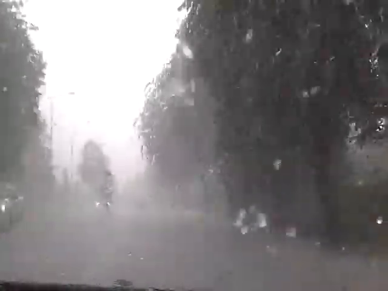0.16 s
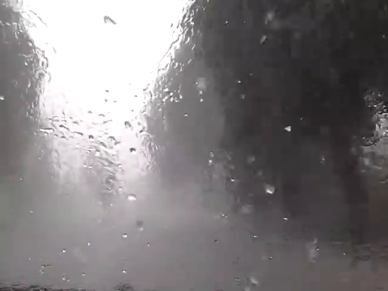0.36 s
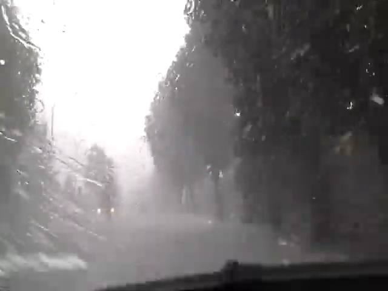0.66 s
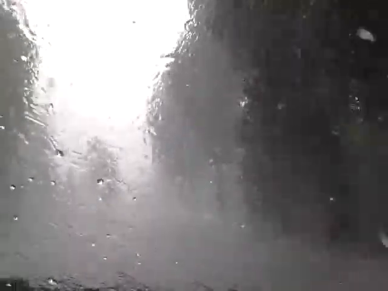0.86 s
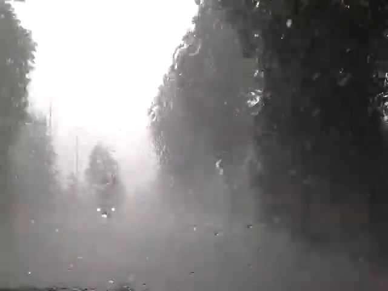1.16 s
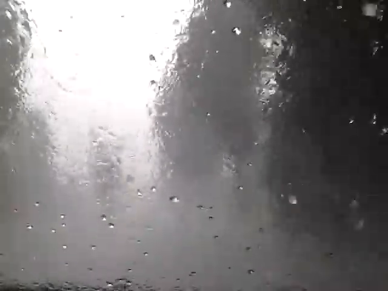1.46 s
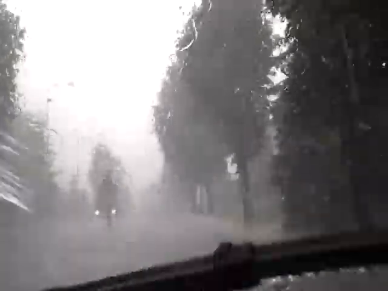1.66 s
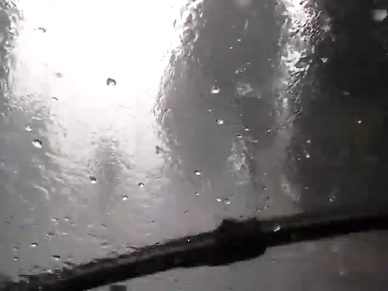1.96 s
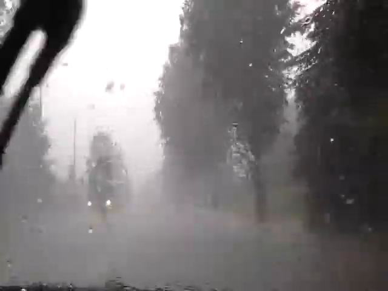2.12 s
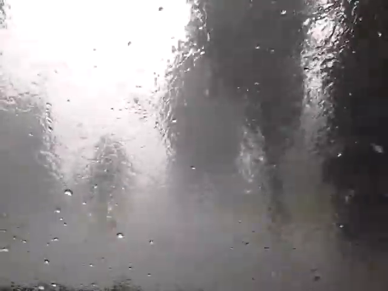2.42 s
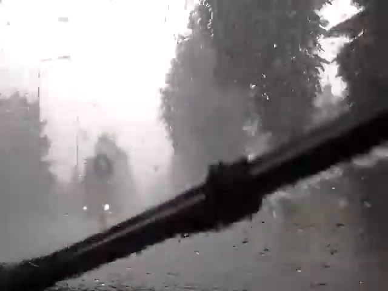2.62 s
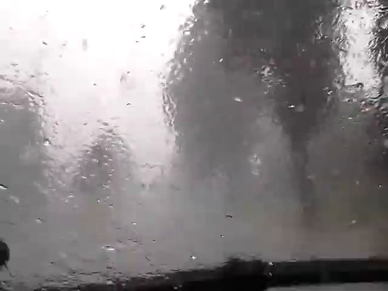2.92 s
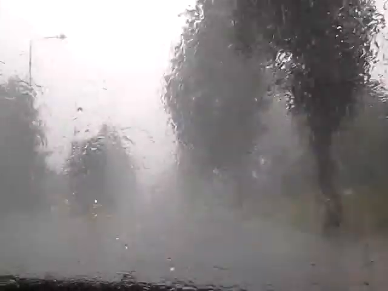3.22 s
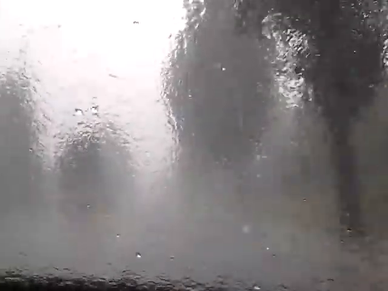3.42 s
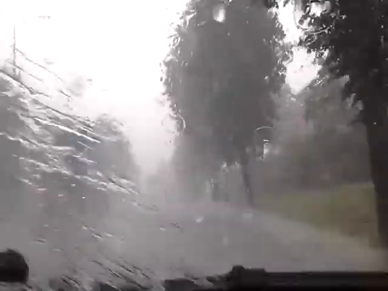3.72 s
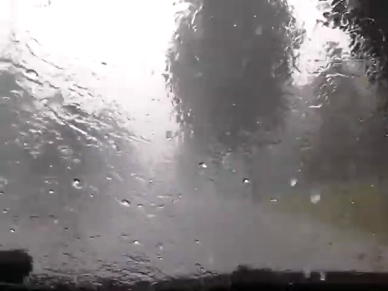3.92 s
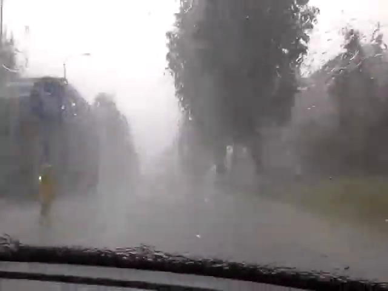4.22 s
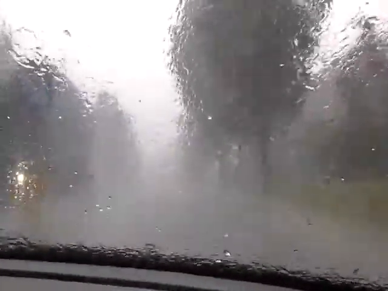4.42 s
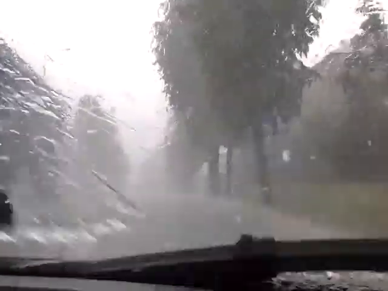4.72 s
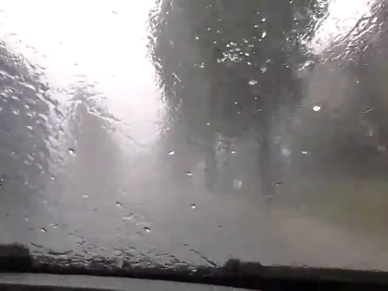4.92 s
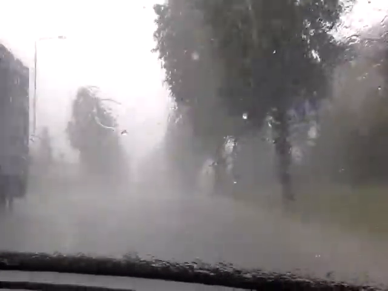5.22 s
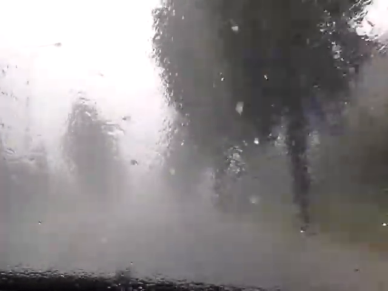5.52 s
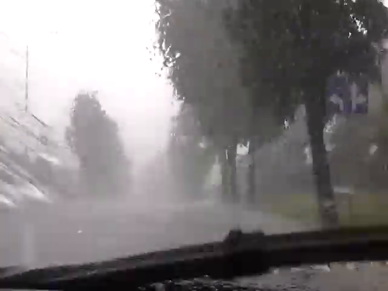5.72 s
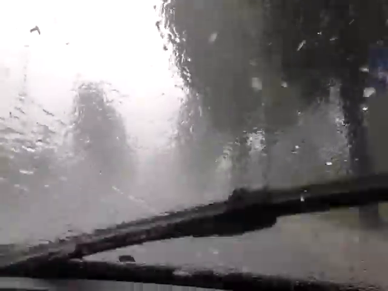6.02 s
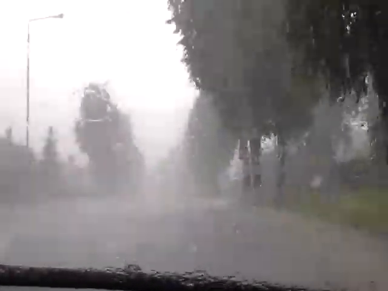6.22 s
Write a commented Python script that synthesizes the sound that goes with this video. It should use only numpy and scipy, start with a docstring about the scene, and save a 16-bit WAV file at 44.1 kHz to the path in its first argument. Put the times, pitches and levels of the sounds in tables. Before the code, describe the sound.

Heard from inside a car, hail and heavy rain beat on the metal and glass from 0 to about 6.4 seconds, already at full force at the start and never stopping. Around fifty irregular hailstone blows a second land, each a bright hard crack with a knock and thud, followed by a short dense noisy ring of panel and cabin lasting about a tenth of a second. Rain and small hail patter between them in brief flurries and lulls; dry pellets tick on glass. Soft low bumps come and go underneath, but bass is thin. Especially hard hits stand out near 2.6, 3.0, 3.2, 4.6 and 5.8 seconds. From about 2.4 the bright edge slowly dulls, is darkest near 5.2, then opens again to the end. The sound is close, wide and harsh, with the loudest cracks clipping the stereo microphone.

```python
"""Hail and heavy rain beat on a car, heard from inside, from the first moment to the last.
A blow starts with a crack on the panel, then leaves a short dense ring of filtered noise in metal and cabin.
Drops fill the gaps in flurries and lulls, pellets tick dryly, and soft low bumps swell and fade underneath.
From about 2.4 s the bright edge slowly dulls, is darkest at 5.2 s, then opens up again.
A two-port microphone with a thin bass overloads on the hardest blows throughout."""
import sys
import numpy as np
from scipy import signal
from scipy.fft import rfft, irfft, next_fast_len
from scipy.io import wavfile

SR = 44100
rng = np.random.default_rng(int(sys.argv[2]) if len(sys.argv) > 2 else 0)


def unload_wav(signal):
    """Save mono or channel-first audio to the path in sys.argv[1] as 16-bit WAV at rate SR, clipped to [-1, 1]."""
    wavfile.write(
        sys.argv[1],
        SR,
        np.round(np.clip(np.atleast_2d(signal).T, -1, 1) * 32767).astype(np.int16),
    )


N = 280917
LEFT_RIGHT = np.array([[1], [-1]])   # sign of half a left-right difference


def from_db(db):
    """Decibels become an amplitude factor."""
    return 10 ** (np.asarray(db) / 20)


def rms_one(x):
    """Scale a sound to an rms of 1."""
    return x / np.sqrt(np.mean(x ** 2) + 1e-20)


def at_hz(curve, hz):
    """Read a curve at a pitch, with straight lines over log frequency."""
    curve_hz, values = np.transpose(curve)
    return np.interp(np.log(hz), np.log(curve_hz), values)


def filtered(x, order, hz, kind):
    """Butterworth filter along time."""
    return signal.sosfilt(signal.butter(order, hz, kind, fs=SR, output="sos"), x)


# Decay of panel and cabin. Each row: frequency in Hz, time to fall by 60 dB in seconds.
PANEL_DECAY = [(250, 0.17), (700, 0.083), (1500, 0.11), (4000, 0.054), (8000, 0.12)]
# How much the ports share. Each row: frequency in Hz, left-right likeness from 0 to 1.
PORT_LIKENESS = [(150, 1), (330, 0.73), (700, 0.4), (1400, 0.26), (4000, 0.34), (8000, 0.069)]
# The ports differ in colour. Each row: frequency in Hz, left minus right in dB.
PORT_COLOUR = [(60, -1), (140, 8), (310, 0), (720, 1), (1100, 0), (1640, 2), (2100, 2), (2500, 4.5),
               (3300, 5), (4200, 7.5), (4800, 1), (5400, -2), (6800, -3), (8570, 0)]
LEFT_LAG_S = 0.00045   # the shared sound reaches the left port later; full lag from 1 kHz up
PART_HZ = [1200, 2400]   # thud below, knock between, crack above
TICK_T60_S = 0.023   # the direct tick over the ring
SPOT_SPREAD_DB, SPOT_TILT_DB = 3.0, 1.5   # spread per band; spread of brightness per octave
CONTACT_CYCLES = 2.0   # a blow builds up over about two cycles of each band


def panel_rings(colour, tick_db, count):
    """What a blow on each of several spots sends to the ports: (thud, knock, crack) x spot x side x time.
    The modes lie too close to tell apart: noise in fifths of an octave, each dying at its own rate."""
    t = np.arange(6144) / SR
    run_in = 1024   # samples for the filters to settle
    edges = 140 * 2 ** (np.arange(31) / 5)
    rings = np.zeros((3, count, 2, len(t)))
    tick = from_db(tick_db - 60 * t / TICK_T60_S)
    tilt_db = SPOT_TILT_DB * rng.standard_normal((count, 1, 1))
    for low, high in zip(edges, edges[1:]):
        hz = np.sqrt(low * high)
        alike, t60 = at_hz(PORT_LIKENESS, hz), at_hz(PANEL_DECAY, hz)
        shared, left, right = rng.standard_normal((3, count, len(t) + run_in))
        lag = round(LEFT_LAG_S * SR * min(1, hz / 1000))   # the bass arrives closer together
        common = np.stack([np.roll(shared, lag, axis=1), shared], axis=1)
        separate = np.stack([left, right], axis=1)
        noise = np.sqrt(alike) * common + np.sqrt(1 - alike) * separate
        steady = filtered(noise, 2, [low, high], "band")[..., run_in:]

        decay = tick + from_db(-60 * t / t60)
        build_up = 1 - np.exp(-t * hz / CONTACT_CYCLES)
        band = steady * decay * build_up / np.sqrt(t60)   # long rings start softer
        side_db = at_hz(PORT_COLOUR, hz) / 2 * LEFT_RIGHT
        # every spot favours other modes, and some spots are brighter
        spot_db = SPOT_SPREAD_DB * rng.standard_normal((count, 1, 1)) + tilt_db * np.log2(hz / PART_HZ[1])
        part = np.searchsorted(PART_HZ, hz)
        rings[part] += from_db(at_hz(colour, hz) + side_db + spot_db) * band
    return rings


def strike(at, sizes, pan_db, rings):
    """Blows are dealt to the spots in turn; each sets off the ring of its spot by convolution."""
    size = next_fast_len(N + rings.shape[-1])
    out = np.zeros((2, N))
    for side, sign in enumerate((1, -1)):
        side_sizes = sizes * from_db(sign * pan_db / 2)
        spectrum = 0
        for spot, ring in enumerate(rings):
            mine = slice(spot, None, len(rings))
            clicks = np.zeros(N)
            np.add.at(clicks, at[mine], side_sizes[mine])
            spectrum = spectrum + rfft(clicks, size) * rfft(ring[side], size)
        out[side] = irfft(spectrum, size)[:N]
    return out


# Flurries and lulls of the shower. Each row: middle in seconds, change in dB, whole length in seconds.
FLURRIES = [(0.472, -6, 0.043), (0.514, 8, 0.04), (0.939, -6, 0.11), (1.302, -3, 0.037),
            (1.525, -6.5, 0.062), (2.694, 2.5, 0.12), (2.904, 2, 0.058), (2.986, 5, 0.089),
            (3.129, 5.5, 0.11), (3.278, -9.5, 0.083), (3.308, 6, 0.035), (3.355, -7, 0.078),
            (3.506, 7, 0.063), (3.792, -10.5, 0.057), (3.893, 5.5, 0.055), (4.019, -10, 0.053),
            (4.442, -6, 0.085), (4.583, 2.5, 0.64), (4.778, -17, 0.043), (4.992, -6, 0.038),
            (5.028, 5.5, 0.033), (5.05, -4.5, 0.027), (5.09, 9, 0.064), (5.151, -7, 0.099),
            (5.253, -3, 0.047), (5.308, 9, 0.12), (5.916, -4.5, 0.069), (5.98, -5.5, 0.11),
            (6.052, 4.5, 0.26)]


def flurries_db():
    """Each flurry or lull swells and fades as a smooth raised cosine in dB."""
    t = np.arange(N) / SR
    out = np.zeros(N)
    for middle_s, change_db, length_s in FLURRIES:
        out += change_db * np.cos(np.pi * np.clip((t - middle_s) / length_s, -.5, .5)) ** 2
    return out


# Slow course of the shower. Each row: time in seconds, level in dB before the flurries.
SHOWER_LEVEL = [(0.0, -15), (0.19, -16), (3.48, -16.5), (4.33, -17.5), (4.75, -16.5), (5.2, -19),
                (5.62, -15.5), (6.37, -19.5)]
# Colour of a drop on a panel. Each row: frequency in Hz, relative level in dB per Hz.
DROP_TONE = [(71, -69), (120, -18), (199, -15.5), (361, -4.5), (519, -4.5), (731, -3), (1330, -5.5),
             (1560, -2), (1910, -9.5), (3000, 1), (3930, -2.5), (4600, -2), (5300, -7), (5850, -9.5),
             (7390, -12.5), (8090, -17.5), (9020, -56), (11700, -76), (19800, -120)]
DROPS_PER_S, DROP_TICK_DB = 1000, -4.5   # tick level is over the ring
DROP_SPREAD_DB, DROP_PAN_DB = 3.5, 3.0   # scale of the exponential spread; left-right spread


def shower():
    """Drops and small hail hit the panels at random moments, many weak and a few strong."""
    at = np.flatnonzero(rng.random(N) < DROPS_PER_S / SR)
    count = len(at)
    size_db = DROP_SPREAD_DB * np.minimum(rng.exponential(1, count), 2.8)   # capped
    sizes = from_db(size_db) * rng.choice([-1, 1], count)
    pan_db = DROP_PAN_DB * rng.standard_normal(count)
    rings = panel_rings(DROP_TONE, DROP_TICK_DB, count=12).sum(axis=0)
    patter = strike(at, sizes, pan_db, rings)
    s, level_db = np.transpose(SHOWER_LEVEL)
    return rms_one(patter) * from_db(flurries_db() + np.interp(np.arange(N) / SR, s, level_db))


# Soft low bumps under the hail.
# Each row: middle in seconds, peak in dB midway between the sides, pitch in Hz.
LOW_BUMPS = [(0.339, -39.5, 170), (0.408, -42.0, 117.0), (0.51, -40, 115.0), (0.51, -38, 60),
             (0.639, -31, 176), (0.789, -35, 181.0), (0.895, -43, 179), (1.027, -39, 134.0),
             (1.258, -39, 181.0), (1.32, -41, 45), (1.39, -41, 112.0), (1.416, -39.5, 163.0),
             (1.704, -41, 181.0), (1.774, -44, 119.0), (2.07, -50, 50), (2.078, -42, 127),
             (2.174, -49, 129.0), (2.2, -39, 60.0), (2.212, -37, 177.0), (2.371, -39, 169),
             (2.451, -43, 118.0), (2.493, -37, 174), (2.67, -40.0, 65.0), (2.746, -41.5, 195),
             (2.796, -45.5, 111.0), (2.854, -40.0, 162.0), (2.905, -40, 123.0), (3.059, -38, 161),
             (3.14, -31, 125), (3.22, -40, 55), (3.431, -38, 96.0), (3.51, -31, 166), (3.53, -38, 65.0),
             (3.878, -48.0, 101.0), (3.89, -38, 55), (4.079, -41, 117.0), (4.217, -34.5, 179),
             (4.395, -38, 174), (4.503, -38.5, 178.0), (4.56, -29, 60.0), (4.57, -38, 110.0),
             (4.66, -38, 45.0), (4.668, -32, 195), (4.855, -37, 124), (4.966, -39, 178.0),
             (5.101, -39, 194.0), (5.14, -43, 119), (5.193, -45, 113.0), (5.361, -44, 117),
             (5.469, -43, 175), (5.598, -33, 169), (5.676, -41, 123.0), (5.781, -44, 59.6),
             (5.782, -46, 113.0), (6.02, -36, 60), (6.025, -48, 115.0)]
BUMP_S, BUMP_LEFT_DB = 0.045, 3.0   # whole length; left minus right
BUMP_SKEW_RAD = 1.2   # random spread of the phase on each side


def low_bumps():
    """A low tone swells and fades softly within a moment; the two sides are out of step."""
    out = np.zeros((2, N))
    reach = SR // 10   # samples on either side of the middle
    t = np.arange(-reach, reach) / SR
    swell = np.cos(np.pi * np.clip(t / BUMP_S, -.5, .5)) ** 2
    phases = rng.normal(0, BUMP_SKEW_RAD, (len(LOW_BUMPS), 2, 1))
    for (middle_s, peak_db, hz), phase in zip(LOW_BUMPS, phases):
        sides = from_db(peak_db + BUMP_LEFT_DB / 2 * LEFT_RIGHT)
        first = int(middle_s * SR) - reach
        out[:, first:first + len(t)] += sides * swell * np.sin(2 * np.pi * hz * t + phase)
    return out


# Small hard pellets on the glass.
# Each row: start in seconds, peak of the treble in dB, the band below in dB relative to that peak.
GLASS_PELLETS = [(0.061, -11, -1), (0.1246, -21, 10), (0.1866, -23, 11), (0.2545, -23, 6), (0.3058, -16, 7),
                 (0.349, -25, 13), (0.4033, -18, 15), (0.4543, -19, 8), (0.5514, -23, 12), (0.66, -13, -5),
                 (0.67, -17, 8), (0.6801, -11, 4), (0.6934, -19, 5), (0.714, -26, 14), (0.7339, -21, -1),
                 (0.7812, -22, 8), (0.8707, -19, 9), (0.8874, -26, 13), (0.9168, -25, 14), (0.9377, -20, 6),
                 (0.9667, -30, 9), (1.0503, -23, 12), (1.1536, -17, 9), (1.1965, -18, 11), (1.2114, -15, 3),
                 (1.2865, -27, 14), (1.3468, -14, 8), (1.3859, -14, 4), (1.4461, -24, 13), (1.4588, -23, 9),
                 (1.4965, -29, 16), (1.7516, -23, 9), (1.7727, -15, 2), (1.8569, -16, 11), (1.8883, -25, 9),
                 (1.9486, -26, 9), (2.1124, -16, 2), (2.142, -15, 0), (2.2319, -25, 8), (2.2911, -20, 9),
                 (2.4213, -24, 7), (2.5137, -18, 9), (2.7346, -22, 9), (3.0379, -19, 9), (3.1721, -24, 8),
                 (3.249, -22, 8), (3.3034, -13, 5), (3.3328, -19, 8), (3.3673, -24, 12), (3.3881, -23, 10),
                 (3.4022, -24, 14), (3.5351, -23, 8), (3.5771, -25, 6), (3.7415, -28, 10), (3.9204, -14, 1),
                 (3.9417, -15, 5), (3.984, -17, 2), (4.0825, -13, 9), (4.1418, -9, -2), (4.1588, -21, 3),
                 (4.2541, -28, 9), (4.2782, -24, 13), (4.4097, -27, 4), (4.4198, -33, 10), (4.489, -19, 9),
                 (4.5133, -14, 3), (4.5467, -20, 9), (4.5631, -22, 12), (4.762, -15, -7), (4.7704, -22, 12),
                 (4.839, -21, 7), (4.9382, -28, 9), (4.9682, -15, 8), (5.0624, -28, 7), (5.1045, -9, 0),
                 (5.137, -18, 3), (5.1924, -15, 3), (5.3109, -16, 6), (5.3609, -20, 4), (5.6022, -13, -2),
                 (5.6406, -20, 10), (5.6667, -19, -2), (5.7955, -17, 6), (5.9226, -12, -1),
                 (5.9551, -17, -2), (6.0212, -16, 0), (6.0793, -13, 2), (6.2565, -16, 6), (6.3138, -17, 3),
                 (6.3477, -24, 4)]
# The two bands of a pellet, treble first. Each row: lower edge in Hz, upper edge in Hz.
PELLET_BANDS = [(5300, 8000), (3300, 5200)]
PELLET_T60_S = [0.015, 0.014]   # treble, band below
PELLET_RISE_S, PELLET_PAN_DB = 0.0002, 1   # rise time constant; left-right spread


def pellets():
    """Each is a dry tick of a few milliseconds in two noise bands, without the ring of the sheet metal."""
    t = np.arange(1024) / SR
    out = np.zeros((2, N + len(t)))
    s, treble_db, below_db = np.transpose(GLASS_PELLETS)
    starts = (s * SR).astype(int)
    pan_db = PELLET_PAN_DB * rng.standard_normal((len(s), 1, 1)) / 2 * LEFT_RIGHT
    band_levels_db = (treble_db, treble_db + below_db)
    for edges, level_db, t60 in zip(PELLET_BANDS, band_levels_db, PELLET_T60_S):
        noise = filtered(rng.standard_normal((len(s), 2, len(t))), 2, edges, "band")
        ticks = noise * from_db(-60 * t / t60) * (1 - np.exp(-t / PELLET_RISE_S))
        ticks = ticks / np.abs(ticks.mean(axis=1)).max(axis=1)[:, None, None]   # port mean peaks at 1
        side_db = at_hz(PORT_COLOUR, np.sqrt(edges[0] * edges[1])) / 2 * LEFT_RIGHT
        ticks = ticks * from_db(level_db[:, None, None] + pan_db + side_db)
        for start, tick in zip(starts, ticks):
            out[:, start:start + len(t)] += tick
    return out[:, :N]


# The hailstones. Each row: start in seconds, peak of the crack in dB, knock and then thud as
# rms in dB relative to that peak, left minus right in dB.
HAILSTONES = [(0.0055, -13, -17, -13, -1), (0.038, -18, -19, -4.5, 1), (0.061, -8, -12.5, -17, 2),
              (0.0946, -17, -28, -18, 5), (0.111, -16, -15, -22, -4), (0.119, -12, -9, -22, -2),
              (0.1266, -10.5, -18, -15, 2), (0.1384, -4, -21, -20, -2), (0.1444, 0.5, -19, -22, 0),
              (0.1873, -9, -22, -13.5, 0), (0.218, -6, -13, -17, -3), (0.235, -16, -9, -27, -2),
              (0.2545, -4, -21, -23, 5), (0.2667, -8.5, -25, -17.5, 6.5), (0.2907, -12, -22, -33, -2),
              (0.3048, -4, -22, -33, 8), (0.3132, -8, -29, -19, -5), (0.3456, -5, -9, -19, 1.5),
              (0.3792, -12.5, -14, -12, -4), (0.4028, -2.5, -15, -17, 6), (0.427, -4.5, -18, -15, -2),
              (0.454, -7.5, -30, -17, 3), (0.47, -13, -19, -15, 0), (0.4957, -3.5, -11, -22, 1),
              (0.5076, 2, -15, -21.5, 3), (0.5129, -1.5, -14, -23, -11), (0.5193, -10, -17, -16, 6),
              (0.5513, 2.5, -20.5, -18, -0.5), (0.5924, -12, -8, -11.5, 0), (0.604, -6, -21, -19, 6),
              (0.6128, -5, -18, -18, 1.5), (0.6433, -9.5, -16, -10, 1), (0.659, -3.5, -24, -19.5, 1),
              (0.6694, -10, -22, -30, -3), (0.68, -5.5, -22, -24, 3), (0.6937, -14, -23, -26, 1),
              (0.712, -12, -15, -25, 5), (0.733, -13, -28, -28, 8), (0.746, -18, -18, -5, 1),
              (0.757, -16, -8, -13, -1), (0.7801, -4, -19, -21, 2), (0.7942, -7, -19, -26, 0),
              (0.8278, -7, -19, -16, -5), (0.857, -9.5, -10, -11, 0), (0.87, -3, -26, -28, -3),
              (0.8857, -20, -22, -25, -2), (0.8983, -17, -15, -12, -3), (0.9157, -4.5, -25, -21, -2),
              (0.937, -7.5, -18, -22, 5), (0.9659, -6, -22, -22, 0), (0.9984, -10, -22, -24, 5),
              (1.008, -3.5, -19, -16.5, 1), (1.0358, -9, -26, -19, 2), (1.0485, -6, -22, -24, -4),
              (1.0579, -6, -18, -17, -2), (1.08, -1.5, -19.5, -15.5, 0), (1.1117, -15.5, -4.5, -11, 1),
              (1.127, -20, -3, -9, -8), (1.1524, -2, -23, -34, 1), (1.1847, -12, -11, -27, 0),
              (1.1968, -9, -11, -14, -2), (1.211, -10, -12, -18, 0), (1.2345, -1, -24, -18.5, 1.5),
              (1.256, -4.5, -21, -18, 1), (1.267, -13, -13, -26, -3), (1.2871, -13, -15, -16, 4),
              (1.3119, -11, -13, -10.5, -1), (1.3269, -19, -19, -22, -2), (1.3467, -7.5, -32, -38, 8),
              (1.3695, -14, -23, -26, 3), (1.3843, -5, -32, -31, -4), (1.397, -7, -18, -23, 1),
              (1.4152, -4.5, -28, -24, 1), (1.422, -8, -26, -24, 1), (1.4457, -11, -30, -26, 8),
              (1.4942, -8.5, -21, -19.5, 6), (1.504, -12, -19, -28, 8), (1.5217, -12, -31, -29, 0),
              (1.5418, -16, -22, -15, 0), (1.5473, -6, -27, -23, 4), (1.5796, -14, -30, -32, 5),
              (1.5965, -4.5, -28, -33, 2), (1.635, -12, -7.5, -10, 5), (1.665, -15, -27, -15, 0),
              (1.6818, -9, -27, -27, 2), (1.6914, -1, -17.5, -25, -2), (1.7046, -9, -31, -34, -4),
              (1.7165, -9, -20, -25, 1), (1.7247, -3, -24, -31, 0), (1.7701, -2.5, -22, -30, -2),
              (1.791, -7, -26, -32, -2), (1.8046, -8, -18, -20, 7), (1.8148, -14, -21, -34, 4),
              (1.8245, -12.5, -30, -34, 0), (1.8456, -12, -22, -21, -2), (1.8566, 0, -17, -30, 0),
              (1.867, -21, -22, -23, -1), (1.8858, -7.5, -25, -21, 4), (1.9219, -3.5, -18, -15.5, 1),
              (1.9374, -6, -23, -22, 3), (1.9473, -8, -20, -21, 3), (1.9856, -4, -22, -19.5, -4.5),
              (2.0134, -1.5, -22, -22, -1), (2.0461, -4.5, -25, -23, -3), (2.059, 2, -24, -22.5, 4),
              (2.087, -6, -17, -17, -3), (2.1118, -6.5, -21, -29, 4), (2.125, -14, -17, -28, 2),
              (2.139, -13, -20, -20, -2), (2.164, -7, -20, -19, 3), (2.1734, -7.5, -11, -25, 3),
              (2.1847, -4.5, -12.5, -16, 2), (2.2174, 0, -20, -21.5, 4), (2.2297, -5.5, -31, -30, 13),
              (2.243, -9, -29, -22, 3), (2.2514, -6, -31, -21, -3), (2.2891, -7.5, -20, -17.5, -1),
              (2.322, -8, -15, -17, -1), (2.3308, -6.5, -14, -25, 2), (2.352, -14, -10, -9, 0),
              (2.3752, -14.5, -7, 0, -3), (2.3909, -9, -9, -9, 0), (2.4005, -7, -19, -20, 4),
              (2.421, -6.5, -17, -15, -1), (2.4408, -7.5, -7, -10.5, 0), (2.454, -6, -20, -33, 4),
              (2.465, -21, -16, -31, 2), (2.4883, -13, -30, -28, 9), (2.512, -5.5, -31, -31, 6),
              (2.5283, -3.5, -13.5, -27, 0), (2.5495, -16, -14, -20, 0), (2.568, -7.5, -15, -16.5, -1),
              (2.582, -11, -8, -16, 1), (2.6125, -16, -19, -8.5, -2), (2.62, -17, -15, -4.5, -1),
              (2.6455, 4.5, -25, -25, 1.5), (2.656, -7, -12, -8.5, 1), (2.672, -12.5, -10, -3.5, 0),
              (2.698, -13, -11, -10, 3), (2.7172, -14, -15, -18, 2), (2.7326, -7.5, -15, -20, 2),
              (2.7622, -10, -13, -23, 2), (2.7806, -8, -17, -20, 1), (2.7975, -2.5, -31, -28, -2),
              (2.8082, 2.5, -27, -21, 0), (2.8532, -6, -21, -25, -2), (2.863, -8, -22, -25, 3),
              (2.8738, -6.5, -11.5, -18, 1), (2.893, -9, -10, -18, 8), (2.913, 2, -19, -22.5, 1),
              (2.9606, -17, -18, -11, -5), (2.975, 5, -18, -32, 5), (2.9985, -11, -17, -19, 1),
              (3.0196, -7.5, -15, -16, 1), (3.0378, -3.5, -13, -20, 1), (3.0766, -12.5, -12, -11, 2),
              (3.1116, -8, -14, -15, -5), (3.1225, -7.5, -18, -14, 10), (3.1324, -2, -15, -22, 2),
              (3.1389, 0, -15, -24, -3), (3.17, -4, -17, -38, 3), (3.195, -17, -26, -26, 4),
              (3.2122, 6, -19.5, -21, 0.5), (3.2327, -11, -19, -35, 2), (3.248, -7.5, -15, -17.5, 4.5),
              (3.3035, -3, -23, -30, -3), (3.313, -9, -15, -12.5, 4), (3.333, -6.5, -20, -28, 3),
              (3.3663, -7, -22, -32, 2), (3.3877, -2.5, -23, -17, 0), (3.402, -9, -26, -29, 7),
              (3.4281, -20, -18, -18, -1), (3.4348, -16, -15, -12, 0), (3.4498, -5.5, -18, -31, 6),
              (3.4635, -8.5, -15, -16, -2), (3.483, -1, -31, -26, 5), (3.493, -9, -24, -15, 4),
              (3.4975, -8, -15, -27, 9), (3.5064, -9, -20, -4.5, 4), (3.5346, -4, -19, -34, 0),
              (3.553, -2.5, -19, -22, 1), (3.576, -5.5, -29, -29, 11), (3.5854, -9, -27, -26, -8),
              (3.602, -11, -29, -26, 3), (3.6143, -8, -24, -32, 5), (3.6404, -7, -18, -30, 3),
              (3.6703, -3, -23, -21.5, 0), (3.6864, -5, -20, -20, 5), (3.701, -3, -25, -28, -2.5),
              (3.7134, -9, -27, -25, 2), (3.7396, -5, -23, -28, 2), (3.751, -8.5, -28, -23, 11),
              (3.7632, -13, -23, -33, 0), (3.7929, -6.5, -26, -28, 1), (3.8083, -11, -16, -22, 2),
              (3.8127, -2, -23, -24, 0), (3.8412, -13, -19, -33, 1), (3.862, -24, -17, -19, 5),
              (3.8771, -9.5, -4.5, -6.5, 3.5), (3.8971, -4, -16, -26, 4), (3.9187, -3, -19, -28, 4),
              (3.947, -7, -18, -20.5, 7), (3.9847, -4.5, -19, -34, 0), (3.999, -8, -24, -31, -4),
              (4.0114, -8, -17, -25, 4), (4.0448, -13, -11, -9, 2), (4.0535, -4, -15, -10.5, 0),
              (4.0812, -0.5, -22, -21, 4), (4.1085, -21, -12, -6.5, -7), (4.1328, -2.5, -20, -26, 5.5),
              (4.1404, -5, -25, -18, -2), (4.1589, -0.5, -32, -23.5, -1), (4.1992, -5.5, -27, -21, 6),
              (4.216, 2, -20.5, -23, -2), (4.2531, -2.5, -18, -19.5, -2), (4.2776, -8, -16, -20, -2),
              (4.3138, -10, -26, -20, 7), (4.3198, -9.5, -16, -27, 9), (4.343, -19, -24, -28, 7),
              (4.3617, -15, -25, -26, 8), (4.3829, -15.5, -8, -12, 6), (4.4097, -9.5, -18, -21, 6),
              (4.4186, -6, -15, -25, 3), (4.4438, -13, -14, -15, 3), (4.455, -12, -24, -15, 1),
              (4.487, 2, -23, -21, -3), (4.4988, -1.5, -24, -21.5, 1), (4.5126, -3, -24, -17, 0),
              (4.5462, 0, -11.5, -16, 5), (4.5616, 5.5, -16.5, -17, 0), (4.612, 0.5, -14, -20, 0),
              (4.62, 0.5, -20, -18, 1), (4.6374, -7, -21, -24, -2), (4.6467, -6, -19, -22, 2),
              (4.6668, 2, -16, -19, 2), (4.677, 1.5, -21, -23, 0), (4.7042, -18, -7, -12, -4),
              (4.7365, -7.5, -10, -16, -5), (4.7431, -2.5, -10, -23, 5), (4.7607, -8, -20, -17, -9),
              (4.771, -9, -24, -19, 5), (4.796, -1.5, -19.5, -23, 1), (4.816, -9, -19, -14.5, 2),
              (4.824, -16, -20, -15, 5), (4.8355, -2.5, -25, -25, 1), (4.8526, -13, -20, -22, 4),
              (4.8804, -5.5, -10.5, -19.5, 2), (4.9108, -7.5, -12, -14.5, -4), (4.919, -4.5, -12, -18.5, 6),
              (4.9368, -10, -13, -14, 11), (4.9672, 2.5, -25, -22.5, 2), (5.012, -15, -10, -16, -5),
              (5.028, -7.5, -16, -24, 2), (5.035, -12.5, -6.5, -9.5, 0), (5.062, -6, -16, -19, 4),
              (5.079, -7, -7, -19, 7), (5.0892, -14, -7, -6.5, -13), (5.1042, -3.5, -19, -19, 3),
              (5.1187, -14, -25, -31, 9), (5.1365, -1, -22.5, -25, -1), (5.171, -10, -14, -25, 3),
              (5.1907, 1.5, -20, -22, 5), (5.216, -2.5, -17, -22, 2), (5.2371, -10, -19, -19, -2),
              (5.2755, -4.5, -11.5, -24, -3), (5.31, -4.5, -17, -27, -1), (5.3186, -8, -8, -19, -4),
              (5.328, -4, -20, -22, 13), (5.351, -19, -11, -8, 1), (5.3609, -9.5, -24, -22, 3),
              (5.385, -14, -19, -20, 3), (5.402, -17, -13, -8, -2), (5.4325, -13, -16, -17, 2),
              (5.4507, -0.5, -14, -22, 3), (5.494, -8, -17, -19, 9), (5.507, -8.5, -13, -9, 0),
              (5.519, -16, -16, -8, 7), (5.5317, -13, -18, -14, 6), (5.5458, -7.5, -14, -12.5, 2),
              (5.567, -5, -17, -31, 2), (5.5783, -2, -20, -19, 2), (5.5856, -4.5, -17, -25, -2),
              (5.6021, -7, -19, -17, 5), (5.6242, -2, -21, -24, -3), (5.6387, -3, -23, -27, 2),
              (5.6577, -21, -18, -21, -1), (5.6871, -23, -13, -8, -5), (5.711, -16, -17, -10, 1),
              (5.7389, -9, -21, -14, 2), (5.7552, -2, -23, -22, -1), (5.777, 5.5, -18.5, -28, 4),
              (5.7956, -8, -27, -22, 4), (5.811, -9, -20, -25, -6), (5.8225, 0, -17, -28, 0),
              (5.8463, -5.5, -18, -22, 3), (5.859, -2, -22, -30, -7), (5.8772, -4, -17, -19, 4),
              (5.888, -6.5, -30, -29, -1), (5.9208, -7.5, -19, -39, 0), (5.9316, -13, -20, -26, 4),
              (5.954, -5, -21, -29, 2), (5.977, -19, -11, -15, 0), (5.9826, -15.5, -7, -16, 1),
              (6.021, 1, -19, -16.5, 1), (6.042, 3.5, -23, -26, -6), (6.052, -6, -18, -20, 5),
              (6.0709, -2.5, -23, -33, 2), (6.104, -6.5, -24, -27, 5), (6.124, -9.5, -12, -9, -3),
              (6.1468, -3, -16, -21, 6), (6.1609, -2.5, -22, -14.5, -5), (6.167, 1.5, -23, -32, 2),
              (6.1948, -1, -16.5, -21, -2), (6.2238, 0, -22, -34, 2), (6.249, -21, -15, -16, -4),
              (6.2567, -5.5, -16, -18.5, -2), (6.262, -24, -20, -22, 4), (6.2743, -18.5, -14, -11, 7),
              (6.2905, -11, -12, -14, 0), (6.3136, -6.5, -20, -32, -1), (6.3376, -13, -28, -35, 4),
              (6.347, -13, -22, -26, -1)]
# Colour of a stone on a panel. Each row: frequency in Hz, relative level in dB per Hz within each part.
STONE_TONE = [(71, -55), (120, -47), (226, -38), (361, 1.5), (441, -2.5), (731, -1), (1330, -3),
              (1560, 2.5), (1940, -0.5), (3860, 10), (4600, 4.5), (5300, 1), (5850, -4), (7390, -8),
              (9020, -10), (11700, -80), (19800, -120)]
STONE_TICK_DB = 3.5   # over the ring


def hailstones():
    """A stone on sheet metal gives a bright crack, a knock and a thud, each of its own strength."""
    s, crack_db, knock_db, thud_db, pan_db = np.transpose(HAILSTONES)
    thud, knock, crack = panel_rings(STONE_TONE, STONE_TICK_DB, count=20)
    # thud and knock: rms 1 over the first 9 ms
    thud, knock = [part / np.sqrt(np.mean(part[..., :400] ** 2, axis=(1, 2), keepdims=True))
                   for part in (thud, knock)]
    crack = crack / np.abs(crack.mean(axis=1)).max(axis=1)[:, None, None]   # port mean peaks at 1
    at = (s * SR).astype(int)
    parts = (thud, crack_db + thud_db), (knock, crack_db + knock_db), (crack, crack_db)
    return sum(strike(at, from_db(level_db), pan_db, part) for part, level_db in parts)


# Course of the upper edge of the bright band. Each row: time in seconds, level in dB.
EDGE_LEVEL = [(0, 1), (1.2, 1), (2.4, 1), (3.2, -0.2), (4.2, -1), (5.2, -3.5), (6.37, 0)]
EDGE_HZ = [4200, 5400]


def shade_bright_edge(panels):
    """Lift or dull one bright band by adding or taking away some of it."""
    edge = filtered(panels, 1, EDGE_HZ, "band")
    level_db = np.interp(np.arange(N) / SR, *np.transpose(EDGE_LEVEL))
    return panels + edge * (from_db(level_db) - 1)


BASS_CUT_HZ = 229


def scene():
    """Stones over the shower; the panels radiate little bass, only the low bumps reach low."""
    panels = shade_bright_edge(hailstones() + shower() + pellets())
    return filtered(panels, 9, BASS_CUT_HZ, "high") + low_bumps()


PREAMP_TOP, PREAMP_KNEE = 0.92, 12   # full scale is 1; a higher knee is more abrupt
RUMBLE_CUT_HZ, PORT_TOP_HZ, CUTOFF_HZ = 45, 10340, 15700


def record(dry):
    """The preamp rounds the peaks, rumble and treble fall off, the converter clips flat, the top is cut."""
    rounded = dry / (1 + np.abs(dry / PREAMP_TOP) ** PREAMP_KNEE) ** (1 / PREAMP_KNEE)
    coupled = filtered(rounded, 1, RUMBLE_CUT_HZ, "high")
    heard = signal.sosfilt(signal.cheby2(8, 50, PORT_TOP_HZ, fs=SR, output="sos"), coupled)
    clipped = np.clip(heard, -1, 1)
    return signal.sosfilt(signal.cheby2(12, 60, CUTOFF_HZ, fs=SR, output="sos"), clipped)


dry = scene()
out = record(dry)
unload_wav(out)
```